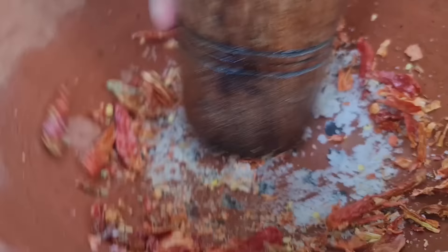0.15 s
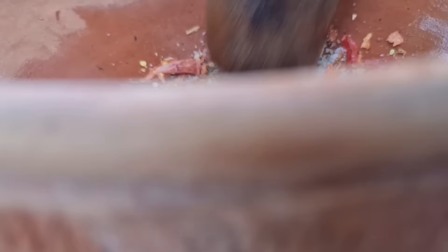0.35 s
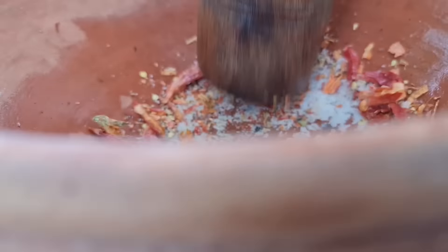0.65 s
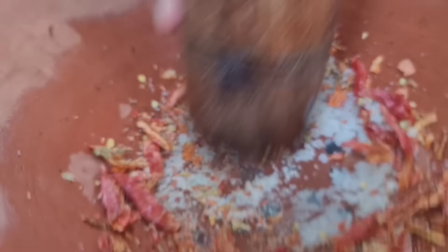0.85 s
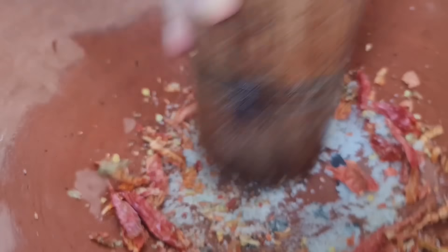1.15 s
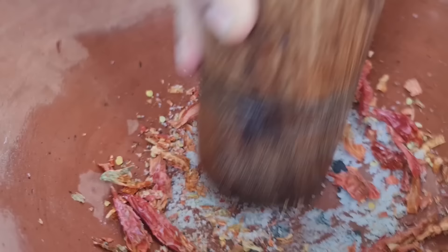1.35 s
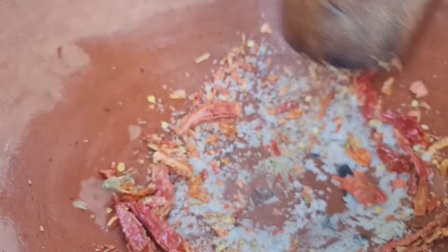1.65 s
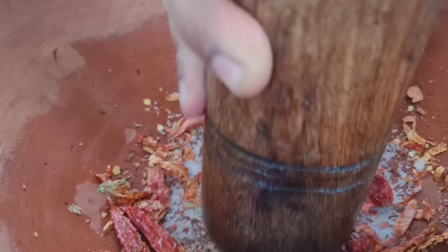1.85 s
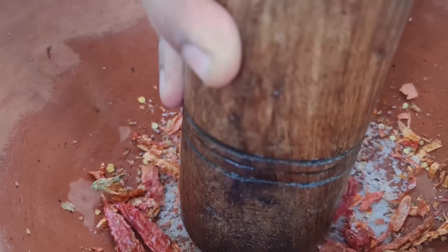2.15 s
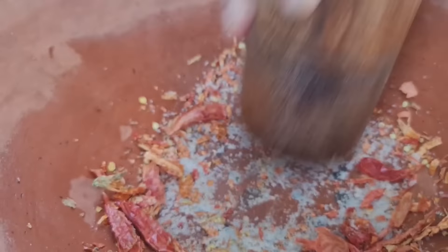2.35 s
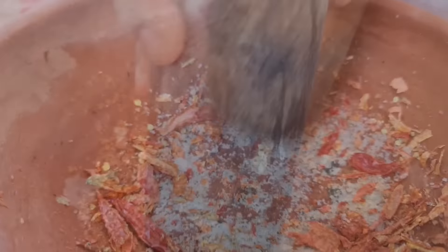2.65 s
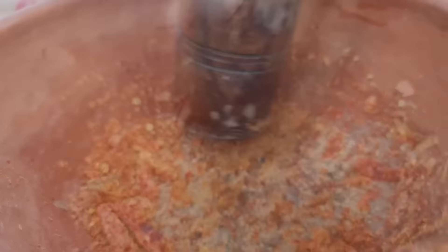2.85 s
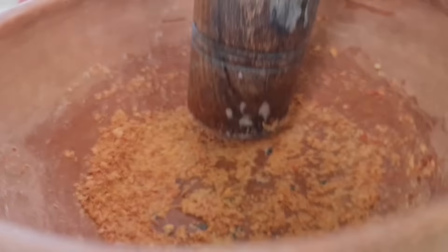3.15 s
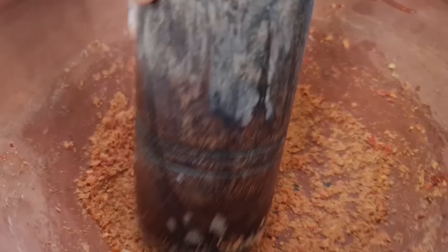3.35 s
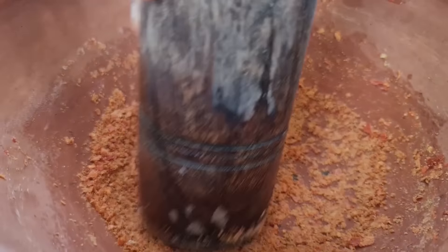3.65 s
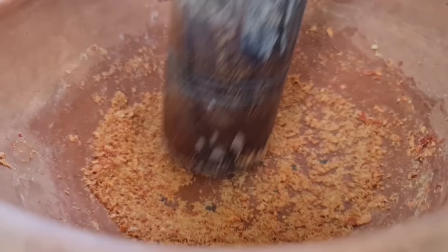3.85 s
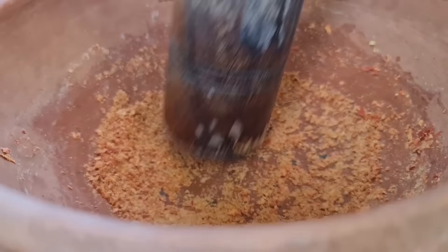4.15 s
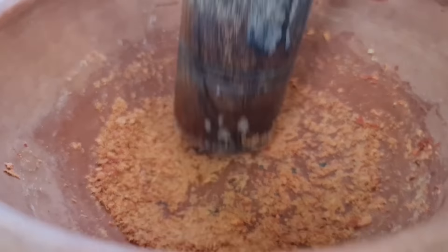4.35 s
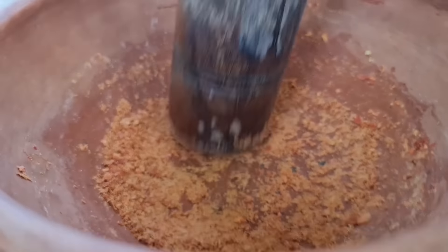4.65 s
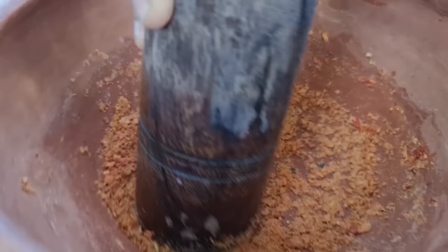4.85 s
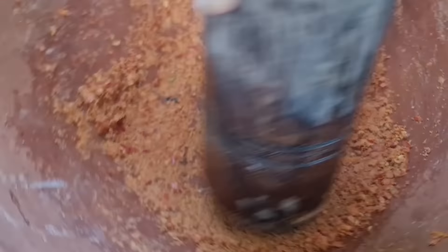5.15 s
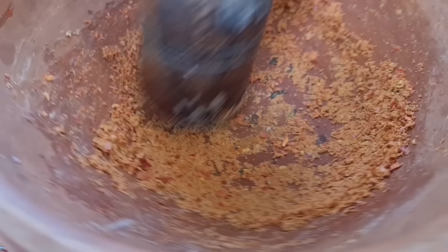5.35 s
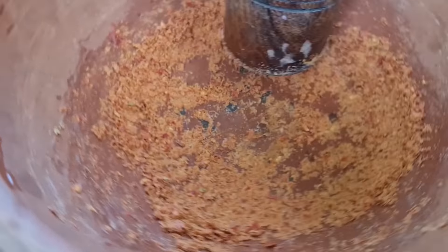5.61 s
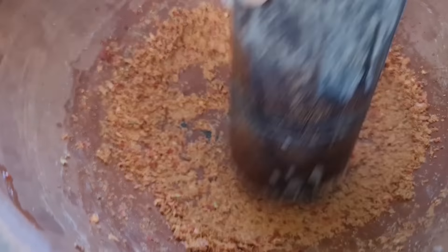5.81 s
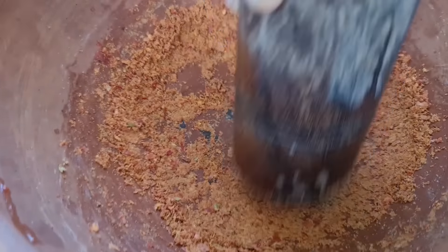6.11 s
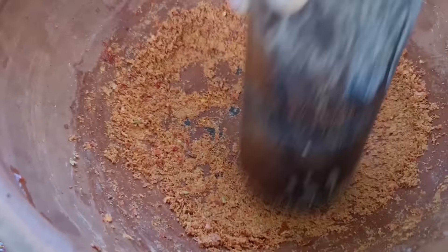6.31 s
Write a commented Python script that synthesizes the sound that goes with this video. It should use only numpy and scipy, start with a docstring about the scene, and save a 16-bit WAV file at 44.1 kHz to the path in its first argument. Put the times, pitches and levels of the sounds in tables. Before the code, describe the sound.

Heard up close in a quiet kitchen, a clay mortar gives a short ringing knock as a wooden pestle starts crushing salt and dried chillies. Fast, gritty strokes alternate heavy and light, with crackling grains, a few sharper crunches and a second ringing knock. Later the spice is a fine powder: the scraping softens a little and the pestle thumps dully and more frequently while keeping its quick rhythm.

```python
"""A quiet kitchen, with a stereo phone close to a clay mortar.
A wooden pestle grinds dried chillies and salt, about six scraping strokes a second. Breaking grains
crackle and excite the bowl's modes; the pestle judders, bumps dully and twice strikes bare clay,
which rings. Coarse salt and flakes come first, later a fine powder that damps the bowl.
Faint wall reflections and steady room tone lie behind."""
import sys
import numpy as np
from scipy import signal
from scipy.fft import rfft, irfft, next_fast_len
from scipy.io import wavfile

SR = 44100
rng = np.random.default_rng(int(sys.argv[2]) if len(sys.argv) > 2 else 0)


def bounce(signal):
    """Save signal as a 16-bit WAV file at the path given by the first command-line argument."""
    frames = np.transpose(np.atleast_2d(signal))
    limited = np.clip(frames, -1, 1)
    pcm = np.round(limited * 32767).astype(np.int16)
    wavfile.write(sys.argv[1], SR, pcm)


N = 285561

# Pestle strokes, mostly a heavy push and a light return in turn; positive lean presses harder late:
# start_s, length_s, lean_db, crunch_db, arm_weight_db
STROKES = [(0.008, 0.15, -4, -40, 6), (0.127, 0.12, 16.5, -44.5, 7.5), (0.243, 0.2, -9, -42, -0.5),
           (0.388, 0.18, 0, -38.5, 6.5), (0.561, 0.17, -20.5, -37.0, -0.5), (0.7, 0.19, -5.5, -37, 4.5),
           (0.884, 0.12, -9, -32, -4), (0.987, 0.2, 7.5, -37.5, 7), (1.178, 0.17, -6.5, -39, 0.5),
           (1.335, 0.18, -11, -33.5, 3), (1.748, 0.19, 1.5, -37.5, 5.5), (1.937, 0.16, -6, -39.0, 1.5),
           (2.085, 0.16, -2, -34.5, 6), (2.24, 0.16, -11.5, -37.5, 0.5), (2.389, 0.14, -5.5, -34.5, 5.5),
           (2.534, 0.17, -1.5, -34.5, 2.5), (2.69, 0.23, -26, -36.5, 5.5), (2.877, 0.17, -21, -37.5, -2),
           (2.989, 0.19, 5.5, -38, 1), (3.169, 0.17, 7, -36, 4.5), (3.342, 0.18, -16.5, -39.5, -3.5),
           (3.482, 0.18, -13.5, -36.5, 3.5), (3.646, 0.17, -8.5, -36, -4.5), (3.798, 0.15, 2.5, -36, 4),
           (3.956, 0.18, -10.5, -37.5, -3), (4.112, 0.16, -6, -35, 5.0), (4.267, 0.19, -13.5, -38.0, -3.0),
           (4.431, 0.14, -18, -35, 4), (4.586, 0.15, -7.5, -38.5, -2), (4.735, 0.16, -18, -35, 5),
           (4.882, 0.17, 2, -36, -2.0), (5.038, 0.2, -4.5, -35.5, 3), (5.184, 0.2, -30, -37.5, -5.0),
           (5.317, 0.13, -8.5, -36.5, 2), (5.415, 0.27, -9.5, -36.0, -2), (5.661, 0.12, -9.5, -34, 4.5),
           (5.793, 0.15, -11, -37.5, -1.5), (5.937, 0.14, 4, -34, 4.5), (6.085, 0.18, -19.5, -37, -2),
           (6.238, 0.15, -4, -34, 3), (6.4, 0.093, -3.5, -35, -1)]
# Pods and salt lumps giving way: start_s, crunch_db
BURSTS = [(0.897, -45), (1.199, -39.5), (1.799, -34.5), (2.728, -35), (2.899, -40.5), (3.395, -38),
          (3.701, -39)]
# Blows on bare clay: start_s, level_db, ring_t60_s, contact_cutoff_hz
BLOWS = [(.0260, -4.5, 0.58, 420), (1.752, -4.5, 0.37, 533)]
# Short, dull knocks of the pestle: bumps while grinding, and the impacts and rebounds of the two
# ringing blows: start_s, level_db, pitch_hz
THUMPS = [(0.0276, -11.5, 497), (0.0358, -12.5, 490), (0.834, -24.5, 184), (1.234, -20, 460),
          (1.403, -18.5, 472), (1.751, -12.5, 600), (1.772, -8, 550), (1.78, -13, 515), (2.733, -20, 465),
          (3.398, -17.5, 554), (3.614, -27, 92), (3.850, -13.5, 490), (3.929, -23.5, 110),
          (4.162, -24, 448), (4.198, -21.5, 64), (4.342, -21, 644), (4.48, -27, 87), (4.767, -17, 480),
          (4.813, -22.5, 69), (5.0921, -12.5, 460), (5.127, -18, 474), (5.165, -16, 140),
          (5.3538, -11, 490), (5.366, -22, 396), (5.679, -12.5, 340), (5.696, -20, 510), (5.7289, -11, 470),
          (5.9912, -7, 460), (6.001, -18.5, 192), (6.296, -13, 490)]
# Modes of the clay bowl: pitch_hz, t60_s, coarse_db, powder_db, left_minus_right_db, left_lead_rad
BOWL_MODES = [(573, 0.17, 8, 9.5, -1, -3.5), (586.5, 0.039, 3.5, 11, -0.5, 0.5),
              (1213.5, 0.099, 6, -2, -0.5, 0.9), (1148.7, 0.061, -6, -2.5, -20.5, -2.1),
              (1389, 0.028, -6.5, -6, -5.5, 2.5), (2065, 0.052, -1, -5, 4, -1.3),
              (2182, 0.034, -4, -13, 0, 1.5), (2470, 0.12, -14, -17, -41, 0.5),
              (3044, 0.0073, -1, -6, -3, -1), (3310, 0.046, 3.5, 8, -3, -1.71), (3540, 0.014, 1, -2, -9, 4),
              (3924, 0.055, -2, -0.5, -8, 1.2), (4140, 0.044, -22, -7, 6, 0),
              (4557, 0.058, -5, 3.5, -7.5, -3.5), (4997, 0.081, -3.5, -2.5, 6, 2.5),
              (5228, 0.021, -10, -4.5, -18, 1.5), (5450, 0.021, -8.5, 1.5, -3, 4),
              (5920, 0.032, -18, -4, -17, 1), (6405, 0.025, -14.5, -4, -10, 3.6),
              (6460, 0.022, -0.5, 0.5, -5.5, -0.5), (8110, 0.076, -10, -12, -12, -1.5)]
# The two states of the spice:
# base_grains_per_s, size_spread_db, ring_time_share, bowl_db, sizzle_db, snap_db, roll_db
COARSE_SPICE = (6007, 3, 1.0, -13.5, 3.5, -24.5, -11.5)
POWDERED_SPICE = (8970.5, 3, 0.94, -16.5, 1.5, -21, -20)
# Borders between rumble, judder, scrape and crunch: frequency_hz
BAND_BORDERS = [150, 900, 2700]
# Colour of the grains' crackle and the pestle's shudder: frequency_hz, relative_db
GRIT_SPECTRUM = [(18, -15), (65, 17.5), (115, 6.5), (175, 11.5), (270, 5.5), (500, 6.5), (750, 4.5),
                 (1100, -3), (1750, -13), (3000, -6), (6700, -6.5), (9000, -27), (10500, -13),
                 (15500, -16.5)]
# Likeness of the sound at the two microphones: frequency_hz, correlation
MIC_CORRELATION = [(60, 0.94), (400, 0.78), (800, 0.35), (1600, 0.77), (6000, 0.12)]
# Colour of the room tone: frequency_hz, relative_db
ROOM_SPECTRUM = [(30, -4), (100, -18), (280, -34.5), (420, -22), (620, -33), (3000, -41), (7200, -44.5),
                 (8500, -58), (15000, -58)]

POWDER_FROM_S = 2.86
SCRAPE_DB, SCRAPE_DB_PER_S = 7, -0.8832  # against crunch: softens as the spice gets finer
RUMBLE_DB, RUMBLE_DB_PER_S = -9, 1.5  # against judder: grows as the powder packs into a cushion
PAN_DB, PAN_DB_PER_S = 4.5, -0.88  # left minus right: the work drifts from the left to the centre


def grinding(trim_db=-0.93, arch=1.25, rumble_per_weight=0.292):
    """The pestle at work, close up: strength sets crunch and scrape; weight adds judder and rumble."""
    out = np.zeros((2, N))
    for start, length, lean_db, crunch_db, weight_db in STROKES:
        scrape_db = crunch_db + SCRAPE_DB + SCRAPE_DB_PER_S * start
        judder_db = crunch_db + weight_db
        rumble_db = judder_db + RUMBLE_DB + RUMBLE_DB_PER_S * start + rumble_per_weight * weight_db
        levels_db = [crunch_db, scrape_db, judder_db, rumble_db]
        sound = stroke(length, lean_db, arch, levels_db, powdery=start > POWDER_FROM_S)
        add(out, start, sound * undb(trim_db) * pan(PAN_DB + PAN_DB_PER_S * start))
    return out


def stroke(length_s, lean_db, arch, levels_db, powdery, size=16384):
    """One pass over the spice: pressure swells and eases, peaking more sharply the higher the arch."""
    spice = POWDERED_SPICE if powdery else COARSE_SPICE
    rate, spread_db, ring_share, bowl_db, sizzle_db, snap_db, roll_db = spice
    f = np.fft.rfftfreq(size, 1 / SR)
    progress = np.clip(np.arange(size) / SR / length_s, 0, 1)
    speed = np.maximum(np.sin(np.pi * progress ** 0.95), 0) * (progress < 1)
    pressure = speed ** arch * undb(lean_db * (progress - .5))
    # the arm's weight bears down more briefly than the crackle lasts
    load = speed ** (1.5 * arch) * undb((1.5 * lean_db + 6) * (progress - .5))
    crackle = fractures(pressure, rate, spread_db, catch_db=3.0)
    shudder = fractures(load, rate / 4, spread_db, catch_db=2.5)
    # salt shatters mostly where the pressure peaks
    shatter = fractures(pressure ** 1.1, rate, spread_db, catch_db=-1.5)
    direct = grit(f, shudder, crackle, shatter, sizzle_db)
    # the contact travels from one spot on the clay to another
    spots = np.array([np.cos(np.pi / 2 * progress), np.sin(np.pi / 2 * progress)])
    clay = sum(rfft(force) * bowl(f, ring_share, powdery) for force in crackle * spots)
    roll = rolling(progress, pressure, weight_db=levels_db[2] - levels_db[0])
    loose_bits = spread(roll) * undb(roll_db) + snaps(pressure, length_s) * undb(snap_db)
    sound = direct + clay * undb(bowl_db) + rfft(loose_bits)
    # crunch, scrape, judder and rumble each take their share of the stroke's work
    lowpasses = [1 / (1 + (f / hz) ** 8) for hz in BAND_BORDERS]
    shares = np.diff(lowpasses, axis=0, prepend=0, append=1)[::-1]
    spectrum = sum(undb(db) * unit(sound * share) for db, share in zip(levels_db, shares))
    return irfft(spectrum, size) * np.sqrt(length_s * SR * size / 2)


def fractures(pressure, rate, spread_db, catch_db, catch_hz=110):
    """Two streams of breaking grains, mostly tiny; they surge as the pestle catches and slips."""
    size = len(pressure)
    knots = rng.standard_normal(512)
    catch = undb(catch_db * np.interp(np.arange(size) / SR * catch_hz, np.arange(len(knots)), knots))
    breaks = rng.random((2, size)) < rate / SR * np.sqrt(pressure)
    sizes = undb(spread_db * np.minimum(rng.exponential(size=(2, size)), 4))
    signs = rng.choice([-1, 1], (2, size))
    return unit(breaks * sizes * signs * catch * pressure ** .75)


def grit(f, shudder, crackle, shatter, sizzle_db):
    """Spectrum going straight to the microphones: low shudder, mid crackle, salt sizzling on top."""
    low = 1 / (1 + (f / 420) ** 4)
    high = 1 - 1 / (1 + (f / 7000) ** 4)
    spectrum = rfft(spread(shudder)) * np.sqrt(low)
    spectrum += rfft(spread(crackle)) * np.sqrt((1 - low) * (1 - high))
    spectrum += rfft(shatter) * np.sqrt(high)
    return spectrum * undb(along(GRIT_SPECTRUM, f) + along([(6000, 0.033), (9000, sizzle_db)], f))


def bowl(f, ring_share, powdery, detune=0.0019, contact_db=2.5, turn_rad_per_khz=0.32):
    """The bowl's response at one point of contact, which shifts, weights and turns each mode."""
    response = 0
    for hz, t60, coarse_db, powder_db, pan_db, phase in BOWL_MODES:
        shift, weight, turn = rng.standard_normal(3)
        half_width_hz = np.log(1000) / (2 * np.pi * t60 * ring_share)
        mode = unit(1 / (1 + 1j * (f - hz * (1 + detune * shift)) / half_width_hz))
        gain = undb((powder_db if powdery else coarse_db) + contact_db * weight)
        at_mics = unit(lobes(pan_db, phase + turn * turn_rad_per_khz * hz / 1000))
        response += gain * at_mics * mode
    return response * np.sqrt(len(f))


def rolling(progress, pressure, weight_db, rest_share=0.49, width_hz=260):
    """Grains roll under the pestle: a hollow band whose pitch follows the sliding speed."""
    speed = np.abs(np.sin(np.pi * progress ** 1.3))  # fastest past the middle
    # heavy strokes slide slowly; light ones skim fast and roll more grains
    top_hz = 1050 * 2 ** (-0.07 * weight_db)
    phase = 2 * np.pi * np.cumsum(top_hz * (rest_share + (1 - rest_share) * speed)) / SR
    lowpass = signal.butter(2, width_hz / 2, fs=SR)
    flutter = signal.lfilter(*lowpass, rng.standard_normal((2, 2, len(speed))))
    hollow = flutter[0] * np.cos(phase) + flutter[1] * np.sin(phase)
    return unit(hollow * pressure) * undb(-weight_db)


def snaps(pressure, length_s, centre_hz=6400, t60_s=0.093, spread_db=4, count=56, size=1300):
    """Brittle flakes and crystals snap, each with a brief ring at its own pitch."""
    out, t = np.zeros((2, len(pressure) + size)), np.arange(size) / SR
    moments, traits = rng.random(count), rng.standard_normal((count, 4))
    for moment, (pitch, strength, side, phase) in zip(moments, traits):
        at = min(int(moment * length_s * SR), len(pressure) - 1)
        hz = centre_hz * 2 ** np.tanh(0.57 * pitch)
        ping = ring(t, hz, t60_s, 3 * side, np.pi * phase)
        out[:, at:at + size] += pressure[at] * undb(spread_db * strength) * ping
    return unit(out[:, :len(pressure)])


def bursts(length_s=0.084, scrape_db=-1.5, judder_db=-4, rumble_db=-14):
    """A piece gives way under the pestle: a sudden, brief shower of fractures."""
    out = np.zeros((2, N))
    for start, crunch_db in BURSTS:
        levels_db = crunch_db + np.array([0, scrape_db, judder_db, rumble_db])
        powdery = start > POWDER_FROM_S
        add(out, start, stroke(length_s, lean_db=-14, arch=0.19, levels_db=levels_db, powdery=powdery))
    return out


def blows(upper_db=-4, upper_t60_stretch=2.5, rise_s=0.0004):
    """The pestle rebounds and leaves the bowl free; soft wood excites mainly the lowest mode."""
    out, t = np.zeros((2, N)), np.arange(24000) / SR
    for start, level_db, free_t60, cutoff_hz in BLOWS:
        # the free ring reaches the two microphones in nearly opposite phase
        sound = ring(t, BOWL_MODES[0][0], free_t60, pan_db=1.0, phase=2.74)
        for hz, t60, mode_db, _, pan_db, phase in BOWL_MODES[2:]:
            gain = undb(mode_db + upper_db) / (1 + (hz / cutoff_hz) ** 2)
            sound += gain * ring(t, hz, t60 * upper_t60_stretch, pan_db, phase)
        add(out, start, undb(level_db) * sound * (1 - np.exp(-t / rise_s)))
    return out


def thumps(rise_cycles=0.58, pan_db=4.0, roughness=0.76):
    """Short, dull knocks of the pestle: each a rough tone that dies within a few cycles."""
    out, t = np.zeros((2, N)), np.arange(4096) / SR
    for start, level_db, hz in THUMPS:
        age = t * hz / rise_cycles
        noise = unit(band(rng.standard_normal(len(t)), 0.2 * hz, 1.53 * hz, order=4)) * np.sqrt(len(t))
        body = roughness * noise - np.sin(2 * np.pi * hz * t)
        envelope = age * np.exp(1 - age)
        add(out, start, undb(level_db) * envelope * body * pan(pan_db))
    return out


def wall_reflections(dry, wet_db=-23, t60_s=0.086):
    """The kitchen walls return a short tail, faint this close to the mortar."""
    t = np.arange(11025) / SR
    noise = band(rng.standard_normal((2, len(t))), 150, 9000, order=1)
    tail = unit(noise * undb(-60 * t / t60_s))
    return undb(wet_db) * signal.fftconvolve(dry, tail, axes=1)[:, :N]


def room_tone(level_db=-52):
    """Steady, bass-heavy noise far behind the mortar."""
    size = next_fast_len(N, True)
    noise = spread(rng.standard_normal((2, size)))
    colour = undb(along(ROOM_SPECTRUM, np.fft.rfftfreq(size, 1 / SR)))
    air = unit(irfft(rfft(noise) * colour, size))[:, :N] * np.sqrt(N)
    return undb(level_db) * air


def ring(t, hz, t60, pan_db, phase):
    """One decaying mode as the two microphones hear it."""
    mode = np.exp((2j * np.pi * hz - np.log(1000) / t60) * t)
    return (lobes(pan_db, phase) * mode).imag


def lobes(pan_db, phase):
    """Complex gains of a mode: the microphones face different lobes of the vibrating wall."""
    return pan(pan_db) * np.array([[1], [np.exp(-1j * phase)]])


def pan(db):
    """Microphone gains, left louder than right by db."""
    return undb([[db / 2], [-db / 2]])


def spread(pair):
    """Two unrelated sounds become left and right: alike in the bass, barely related in the treble."""
    size = pair.shape[-1]
    alike = along(MIC_CORRELATION, np.fft.rfftfreq(size, 1 / SR))
    mid, side = rfft(pair) * np.sqrt([(1 + alike) / 2, (1 - alike) / 2])
    return irfft([mid + side, mid - side], size)


def undb(db):
    """Decibels to gain."""
    return 10 ** (np.asarray(db) / 20)


def unit(x):
    """Scale to a mean energy of one per channel."""
    return x / np.sqrt(np.mean(np.sum(np.abs(x) ** 2, axis=-1)) + 1e-18)


def along(points, hz):
    """Read (frequency_hz, value) points on a log-frequency axis."""
    f, value = np.transpose(points)
    return np.interp(np.log(hz + 1), np.log(f), value)


def band(x, low_hz, high_hz, order):
    """Causal band-pass."""
    return signal.sosfilt(signal.butter(order, [low_hz, high_hz], "band", fs=SR, output="sos"), x)


def add(out, start_s, sound):
    """Mix a stereo sound in at start_s."""
    start = max(int(start_s * SR), 0)
    part = sound[:, :max(N - start, 0)]
    out[:, start:start + part.shape[1]] += part


def scene():
    """Mortar and pestle up close, the kitchen behind."""
    mortar = grinding() + bursts() + blows() + thumps()
    return mortar + wall_reflections(mortar) + room_tone()


def record(dry, low_cut_hz=36, top_hz=15850):
    """The phone thins the deepest bass, clips at full scale and cuts the top."""
    thinned = signal.sosfilt(signal.butter(3, low_cut_hz, "high", fs=SR, output="sos"), dry)
    clipped = np.clip(thinned, -1, 1)
    return signal.sosfilt(signal.ellip(10, .2, 80, top_hz, fs=SR, output="sos"), clipped)


dry = scene()
out = record(dry)
bounce(out)
```